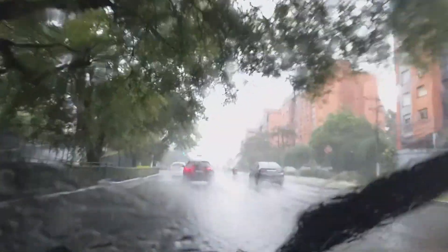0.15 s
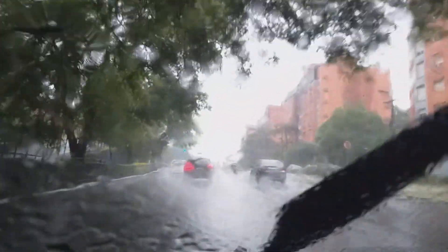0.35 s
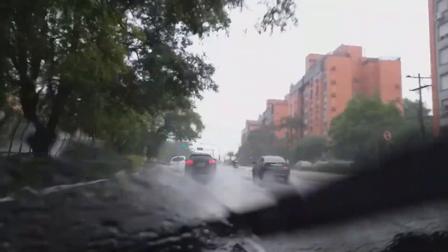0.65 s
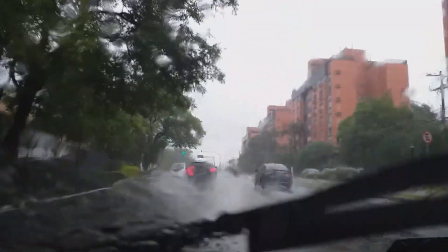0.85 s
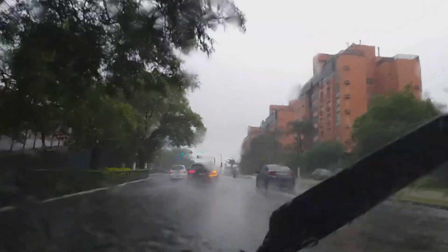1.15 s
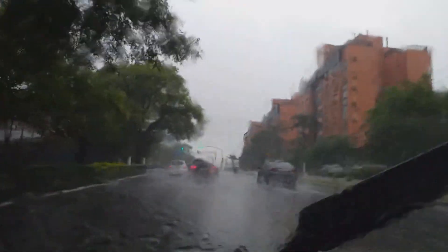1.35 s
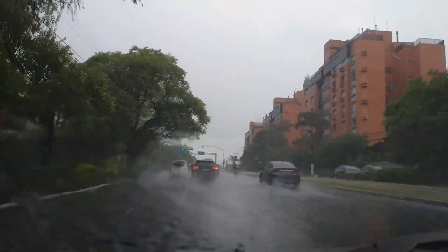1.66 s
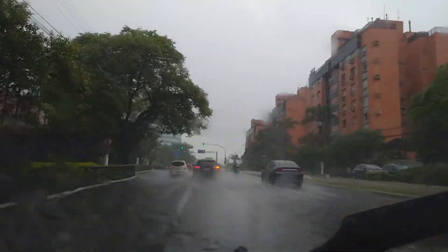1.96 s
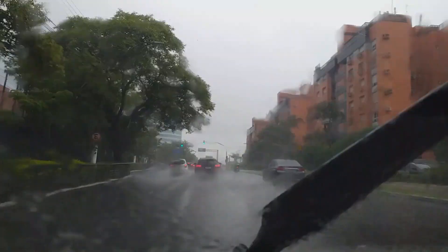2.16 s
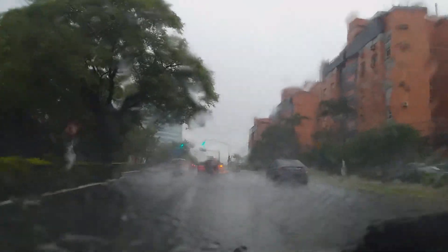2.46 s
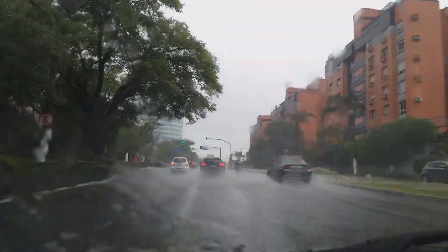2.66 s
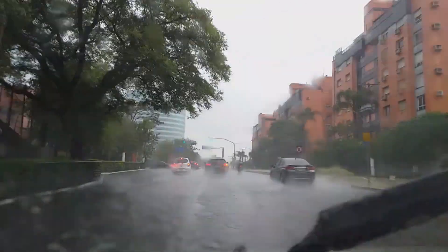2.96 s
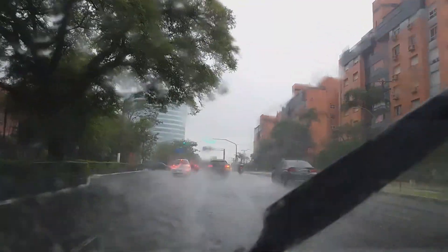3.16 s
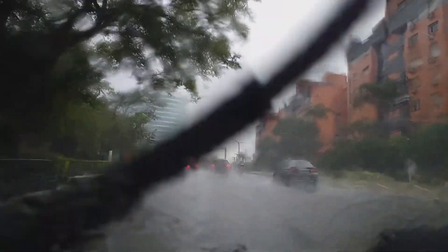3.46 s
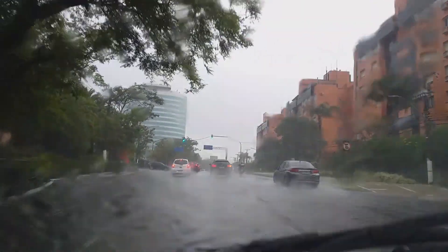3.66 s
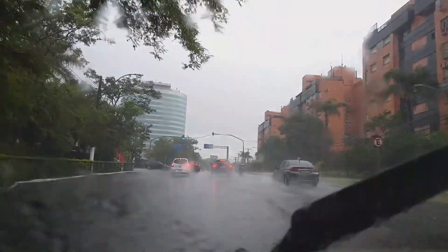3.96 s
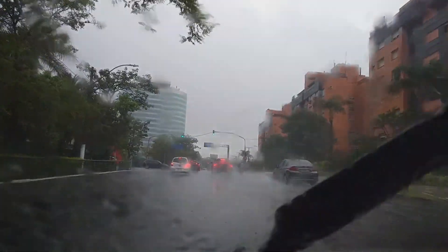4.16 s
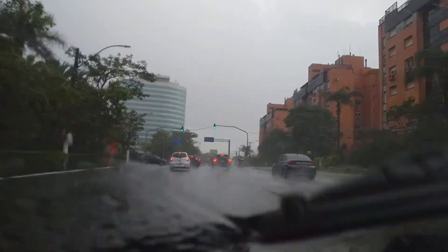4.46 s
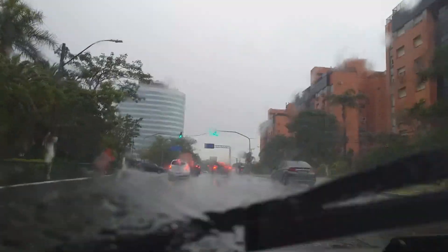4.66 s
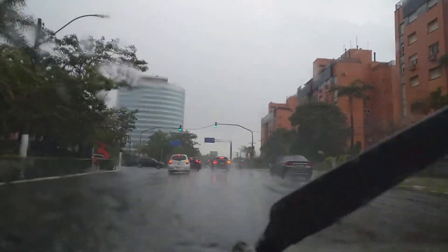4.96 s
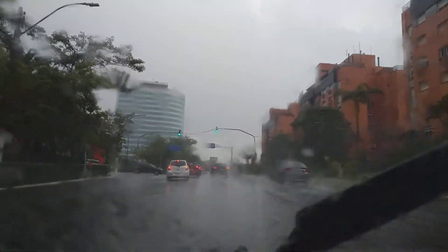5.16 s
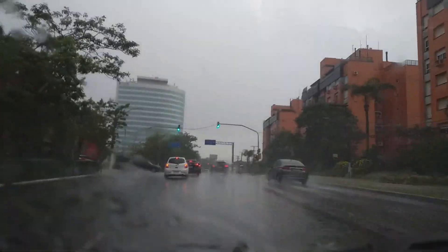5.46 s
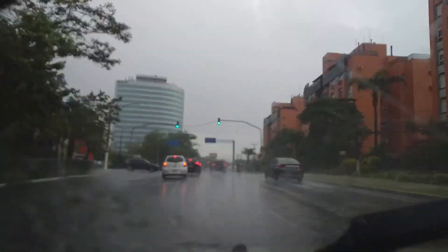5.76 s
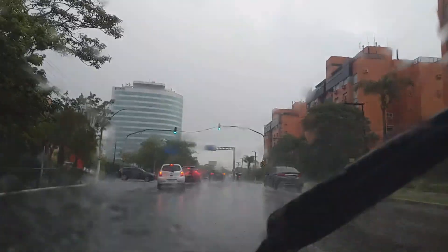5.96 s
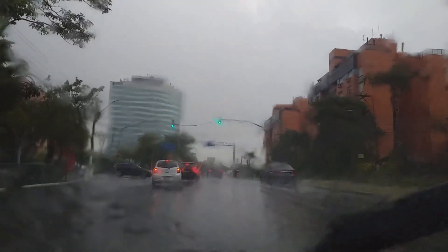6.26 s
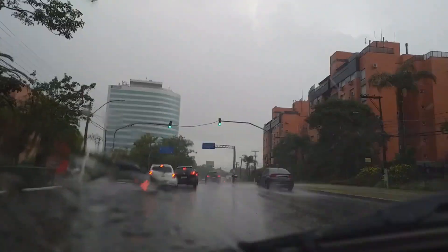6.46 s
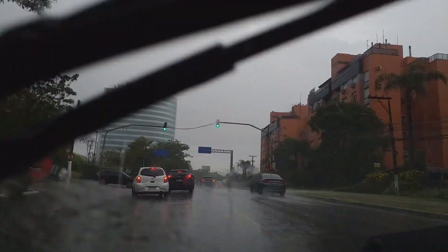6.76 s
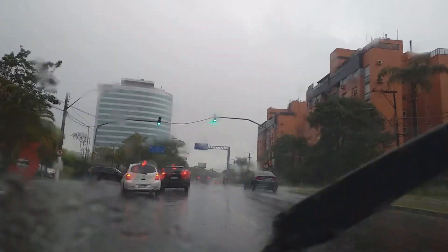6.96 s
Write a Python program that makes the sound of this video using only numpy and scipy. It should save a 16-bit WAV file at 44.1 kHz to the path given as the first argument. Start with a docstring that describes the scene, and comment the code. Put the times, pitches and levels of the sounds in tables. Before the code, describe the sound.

Heavy rain ticks and drums on the windscreen and roof of a slowing car while wipers thump back and forth over a low tyre rumble.

```python
"""Rain on a slowing car

Heavy rain on a car that slows in traffic, heard from the cabin. Drops tick on the windscreen and roof,
with fat ones falling from the trees: each is a short click with echoes and a tail, and the panes ring on.
The wipers knock and slap at each turn, and jolts thump the screen: both are short ringing tones.
Below it all the tyres rumble on the wet road (shaped noise) and the engine note sinks (two sine tones)."""
import sys
import numpy as np
from scipy import signal
from scipy.fft import rfft, irfft
from scipy.io import wavfile
from scipy.ndimage import uniform_filter1d

SR = 44100
rng = np.random.default_rng(int(sys.argv[2]) if len(sys.argv) > 2 else 0)


def master_out(mix):
    """Clip the mix to full scale and print it as 16-bit PCM to the path in sys.argv[1]."""
    frames = np.transpose(np.atleast_2d(mix))
    ceiling = np.clip(frames, -1, 1)
    pcm = np.round(ceiling * 32767).astype(np.int16)
    wavfile.write(sys.argv[1], SR, pcm)


N = 313992
TIME = np.arange(N) / SR  # seconds


def amp(db):
    """Turns decibels into a gain."""
    return 10 ** (np.asarray(db) / 20)


def scale_to_rms_one(x):
    """Scales a sound to an rms of 1."""
    return x / np.sqrt(np.mean(x ** 2) + 1e-20)


def scale_to_energy_one(x):
    """Scales a sound so that its squares add up to 1."""
    return x / (np.linalg.norm(x) + 1e-12)


def scale_to_peak_one(x):
    """Scales a sound to a peak of 1."""
    return x / abs(x).max()


def spectrum_db(points, hz):
    """Reads a spectrum in dB, joining its points by lines on a log-frequency axis."""
    point_hz, point_db = np.transpose(points)
    return np.interp(np.log(hz + 1), np.log(point_hz), point_db)


def curves(rows):
    """Reads each column of a table of times, joined by lines, at every sample."""
    seconds, *columns = np.transpose(rows)
    return [np.interp(TIME, seconds, column) for column in columns]


def add(mix, start_s, sound):
    """Mixes a sound in from a given time, cutting off what runs past the end."""
    part = mix[max(round(start_s * SR), 0):][:len(sound)]
    part += sound[:len(part)]


def shaped_noise(points):
    """Steady noise with a given spectrum, scaled to rms 1."""
    gain = amp(spectrum_db(points, np.fft.rfftfreq(N, 1 / SR)))
    return scale_to_rms_one(irfft(rfft(rng.standard_normal(N)) * gain, N))


def wander(rate_hz):
    """Slow random drift of rms 1: noise that fades out above a given rate."""
    gain = np.exp(-(np.fft.rfftfreq(N, 1 / SR) / rate_hz) ** 2)
    return scale_to_rms_one(irfft(rfft(rng.standard_normal(N)) * gain, N))


def ring(modes, detune, size=8192):
    """A struck body: dying tones, each with the energy its dB gives, randomly detuned at each blow."""
    t = np.arange(size) / SR
    total = np.zeros(size)
    for hz, db, t60 in modes:
        tone = np.sin(2 * np.pi * hz * (1 + detune * rng.standard_normal()) * t)
        total += amp(db) * scale_to_energy_one(tone * amp(-60 * t / t60))
    return total


# The basic colour of a drop heard through the glass.
# Each row: frequency in Hz, level in dB before the changes made for each drop.
GLASS_COLOUR = [(60, -43), (200, -12.5), (450, -10), (760, -6.5), (1100, -13.5), (1650, -6.5), (2600, -4.5),
                (3400, -0.5), (4700, -7.5), (6900, -31), (8700, -41), (10200, -29), (11300, -28.5),
                (13000, -42), (16000, -49)]


def drop(body_db, splash_db, echoed, spot_hz, travel=0., wet_db=-7.5, t60=0.062, spot_db=4.5, size=3072):
    """One impact of energy 1: a click coloured by the glass, waves back from its edges, a short cabin tail."""
    hz, t = np.fft.rfftfreq(size, 1 / SR), np.arange(size) / SR
    body = body_db * spectrum_db([(1400, 1), (2800, 0)], hz)  # full below 1400 Hz
    splash = splash_db * spectrum_db([(4000, 0), (8000, 1)], hz)  # full above 8000 Hz
    spot = spot_db * (np.exp(-((hz - spot_hz) / 500) ** 2) - .3)  # each spot of the pane favours its own pitch
    db = spectrum_db(GLASS_COLOUR, hz) + body + splash + spot

    # give the click a sudden start with nothing before it (minimum phase)
    mirrored_db = np.r_[db, db[-2:0:-1]]
    click = np.exp(np.conj(signal.hilbert(np.log(amp(mirrored_db)))))[:len(hz)]
    # in glass the bass lags the treble; travel is the delay in seconds at 3 kHz
    click = click * np.exp(-4j * np.pi * travel * np.sqrt(3000 * hz))

    delay_s = rng.uniform(0.00037, 0.002412, 7)
    height = scale_to_energy_one(rng.standard_normal(7))
    echoes = height @ np.exp(-2j * np.pi * delay_s[:, None] * hz)
    share = np.clip(echoed, 0, .8)
    late_noise = rng.standard_normal(size) * (t > .0025) * amp(-60 * t / t60)
    tail = rfft(scale_to_energy_one(late_noise))
    response = np.sqrt(1 - share) + np.sqrt(share) * echoes + amp(wet_db) * tail
    return scale_to_energy_one(irfft(click * response))


# Strength of the shower. Each row: time in seconds, level in dB before the gain of each layer of drops.
SHOWER_STRENGTH = [(0, -31.5), (.5, -32), (.72, -36), (1.1, -34), (1.27, -35.5), (1.75, -30), (1.99, -29),
                   (2.13, -34), (2.33, -28.5), (3.1, -28.5), (3.6, -25.5), (4.2, -30), (4.5, -35),
                   (4.85, -38), (5.2, -34.5), (5.58, -35), (5.7, -30), (7.12, -29)]


def patter(per_s, spread_db, gain_db, splash_db, travel, wet_db, brighten=0.076, count=40):
    """Random drops of uneven size, each on one of many spots; per_s is the rate at average shower dB."""
    shower_db, = curves(SHOWER_STRENGTH)
    force_db = shower_db - shower_db.mean()  # a harder shower brings more drops, louder and brighter
    falls = rng.random(N) < per_s * amp(force_db) / SR
    clicks = falls * amp(spread_db * np.minimum(rng.exponential(1, N), 3.2))
    # even out the level between crowded and sparse stretches
    clicks = clicks / np.sqrt(uniform_filter1d(clicks ** 2, size=8000) + 1e-4)

    spot, out = rng.integers(0, count, N), np.zeros(N)
    for k in range(count):
        # some drops sink in the water film, others burst on bare glass
        burst_db = splash_db + 24 * (k / count - .5)
        body_db = 3.4 * rng.standard_normal()
        echoed, spot_hz = rng.uniform(0.087, 0.99), rng.uniform(2150, 4580)
        tick = drop(body_db, burst_db, echoed, spot_hz, travel * rng.random(), wet_db)
        for i in np.flatnonzero(falls & (spot == k)):
            add(out, i / SR, clicks[i] * tick)

    spray = signal.oaconvolve(out, signal.firwin(63, 6000, pass_zero=False, fs=SR), "same")  # above 6 kHz
    brightened = out + (amp(brighten * force_db) - 1) * spray
    return amp(shower_db + gain_db) * scale_to_rms_one(brightened)


# How loud the tyres rumble. Each row: time in seconds, level in dB.
TYRE_LEVEL = [(0, -27), (.4, -28), (1.15, -33.5), (1.5, -30.5), (1.85, -26), (3.5, -24), (4.55, -22.5),
              (4.72, -28.5), (5.35, -29.5), (5.65, -25), (6.65, -23), (7.12, -26.5)]
# The colour of the rumble in the cabin. Each row: frequency in Hz, relative level in dB per Hz.
CABIN_COLOUR = [(20, -42), (35, -23), (60, -9), (88, -1.5), (115, 0.5), (165, -1.5), (235, -11.5),
                (275, -11), (308, -7.5), (350, -13.5), (450, -21.5), (750, -21.5), (1100, -29.5),
                (2500, -64)]


def road(gain_db=0.0, lumpy_db=0.92):
    """Tyre noise booming in the cabin, its level lumpy with the road surface."""
    road_db, = curves(TYRE_LEVEL)
    level_db = road_db + gain_db + lumpy_db * wander(12)
    return amp(level_db) * shaped_noise(CABIN_COLOUR)


# The engine as the car slows. Each row: time in seconds, firing rate in Hz, effort in dB before the boom.
ENGINE_RUN = [(0, 64.1, -27.5), (1.1, 61.6, -35.5), (1.7, 61.5, -37.5), (2.6, 60.25, -27), (4.2, 49.4, -29),
              (4.8, 45.55, -39.5), (6, 40.5, -35.5), (7.12, 37.97, -28)]
# How strongly the cabin booms to an engine tone. Each row: frequency in Hz, gain in dB.
CABIN_BOOM = [(38, -24), (50, -3.5), (60, -1.5), (76, 1), (100, -2), (112, -4.5), (128, -19)]


def engine(waver_db=-1.2):
    """The firing tone and its octave sink through the boom of the cabin as the car slows."""
    firing_hz, effort_db = curves(ENGINE_RUN)
    phase = 2 * np.pi * np.cumsum(firing_hz) / SR
    tones = np.zeros(N)
    for k in (1, 2):
        tones += amp(spectrum_db(CABIN_BOOM, k * firing_hz)) * np.sin(k * phase)
    return np.sqrt(2) * amp(effort_db + waver_db * wander(6.3)) * tones  # root 2 gives a sine rms 1


# Ringing of the panes and roof.
# Each row: frequency in Hz, level in dB before a shared trim, time in seconds to die away by 60 dB.
PANE_RINGING = [(513, -22.5, 0.18), (748, -37, 0.23), (1457, -16, 0.014), (3540, -14.5, 0.004)]


def panes(x, ring_db=-1.5):
    """The windows and roof ring on after every drop, as a few dying tones."""
    colour = amp(spectrum_db(GLASS_COLOUR, np.linspace(0, SR / 2, num=1024)))
    # allow for the colour that the drops already have at each pitch
    modes = [(hz, db - spectrum_db(GLASS_COLOUR, hz), t60) for hz, db, t60 in PANE_RINGING]
    ringing = ring(modes, 0) * np.sqrt(np.mean(colour ** 2))
    return x + amp(ring_db) * signal.oaconvolve(x, ringing)[:N]


# The fattest drops on the glass. Each row: start in seconds, level in dB, low body in dB,
# treble splash in dB, share of energy echoed in the pane from 0 to 1 (held to 0.8 at most).
FATTEST_DROPS = [(.033, -17.5, 1, -2, 0.5), (.0591, -16, 0, -1, .4), (0.1712, -12.5, -2.5, -3, 0.64),
                 (.23, -10, -4, 12, 0.66), (0.296, -19, 1, 8, .55), (.3485, -10, -7, 3.5, .75),
                 (.3767, -12, -3, -8, .7), (0.4901, -10.5, -6.5, 13, 0.73), (.673, -14, -5.5, 5, 0.6),
                 (0.8047, -13.5, 0.5, -9, .8), (0.9634, -16.5, -5, 5, 0.4), (1.0028, -14.5, -1.5, 11, 0.55),
                 (1.0757, -21.5, -2, -18, 0.6), (1.1515, -20, -5.5, 3, .8), (1.3907, -20.5, -1, -1, 0.14),
                 (1.5938, -18, -3.5, 1, .7), (1.6057, -17, -3, 4, 0.03), (1.7893, -14.5, 8, 5, .6),
                 (1.8053, -14.5, 3, 2, 0.7), (1.829, -12.5, 0.5, -6, .8), (1.8827, -18.5, 0.5, 6, .35),
                 (1.985, -14.5, -5, 8.5, 0.03), (2.4984, -14.5, -3.5, 3.5, 0.9), (3.138, -15, -11, -12, 0),
                 (3.5544, -15.5, -6, -20, 0), (3.624, -15, -.5, 9, .7), (4.1336, -12.5, -17, 1, 0.06),
                 (4.1435, -12.5, 0.5, -11, 0.75), (4.1722, -12.5, 1, 8, 0.6), (4.1838, -13.5, -3, 2, 0.4),
                 (4.333, -12.5, -4.5, -6, 0.06), (4.3659, -12, 2.5, -3, .02), (4.4399, -15.5, 4, -7, 0.1),
                 (4.4745, -17, 1, 3, 0.7), (4.572, -18, -6, -6, 0.6), (4.7991, -19.5, 0, -2, 0.9),
                 (5.1628, -20, -14, -1, .2), (5.8825, -16.5, 0, 5, 0), (5.9013, -17, -2, 7, .8),
                 (6.372, -17, 0, 10, .3), (6.42, -16, -1, 1, .8)]
SPOT_HZ, SPOT_SAG_HZ_PER_DB = 2980, 94  # the fuller the body of a drop, the lower the pitch of its spot


def fat_drops(gain_db=0.0):
    """Single loud drops, each one impact whose level is the rms as if spread over 4 ms."""
    out = np.zeros(N)
    for start_s, db, body_db, splash_db, echoed in FATTEST_DROPS:
        spot_hz = SPOT_HZ - SPOT_SAG_HZ_PER_DB * body_db
        tick = drop(body_db, splash_db, echoed, spot_hz, travel=.0002, wet_db=-8.0)
        add(out, start_s, amp(db + gain_db) * np.sqrt(.004 * SR) * tick)
    return out


def drips(above_db=8.0, spread_db=1.1, splash_db=0.0, splash_spread_db=7.0, count=24):
    """Middling drops at random times, each one impact set above the shower's strength."""
    out, (shower_db,) = np.zeros(N), curves(SHOWER_STRENGTH)
    for i in rng.integers(0, N, count):
        size, body, splash = rng.standard_normal(3)
        burst_db = splash_db + splash_spread_db * splash
        echoed, spot_hz = rng.uniform(0.072, 0.89), rng.uniform(2100, 4700)
        tick = drop(2.7 * body, burst_db, echoed, spot_hz, travel=0.00018, wet_db=-9.0)
        level_db = shower_db[i] + above_db + spread_db * size
        add(out, i / SR, amp(level_db) * np.sqrt(.004 * SR) * tick)  # level over 4 ms
    return out


# The windscreen when thumped.
# Each row: frequency in Hz before detuning, relative level in dB, time in seconds to die away by 60 dB.
SCREEN_KNOCK = [(112, -12, 0.13), (184.5, 1, 0.17), (215, 5.5, 0.099), (268.5, -5, 0.23)]


def knock():
    """A thump on the windscreen: its dying tones, with little deep bass."""
    bass_cut = signal.butter(2, 90, "highpass", fs=SR)
    return scale_to_peak_one(signal.lfilter(*bass_cut, ring(SCREEN_KNOCK, 0.06)))


# The blade flipping over.
# Each row: frequency in Hz before detuning, relative level in dB, time in seconds to die away by 60 dB.
BLADE_FLIP = [(544, 1, 0.036), (716, -1, 0.032), (776, -3, 0.03), (950, 4, 0.017), (1130, -8, .02)]
# the wipers swing at a steady pace, then drag: late turns fall further and further behind
SWEEP_S, FIRST_TURN_S, RETURN_S = 0.951, 0.408, 0.397
DRAG_FROM_S, DRAG_SHARE = 5.78, 0.144
# the two ends of a sweep, before the trims in wipers():
# turn above the tyre level in dB, rubber blade relative to that in dB
FAR_END, PARK_END = (15.8, -8.0), (13.8, -23)


def wipers(knock_db=-2.5, flip_db=0.5, slap_db=0.0):
    """At each turn the arms thump the screen and the blades flip with a wet slap; all swell with the rumble."""
    out, (road_db,) = np.zeros(N), curves(TYRE_LEVEL)
    for sweep_s in np.arange(FIRST_TURN_S, N / SR, SWEEP_S):
        for turn_s, (turn_db, blade_db) in (sweep_s, FAR_END), (sweep_s + RETURN_S, PARK_END):
            turn_s = turn_s + DRAG_SHARE * max(turn_s - DRAG_FROM_S, 0)
            base_db = np.interp(turn_s, TIME, road_db) + turn_db
            flip = scale_to_peak_one(ring(BLADE_FLIP, 0.092))
            slap = scale_to_peak_one(drop(body_db=16.0, splash_db=-19, echoed=0.31, spot_hz=2200,
                                          travel=0.001, wet_db=-3.5, t60=0.28))
            add(out, turn_s, amp(base_db + knock_db) * knock())
            add(out, turn_s, amp(base_db + blade_db + flip_db) * flip)
            add(out, turn_s, amp(base_db + blade_db + slap_db) * slap)
    return out


# Jolts that thump the screen. Each row: start in seconds, peak level in dB.
ROAD_JOLTS = [(3.598, -11), (4.565, -15), (6.116, -14)]


def jolts():
    """Bumps in the road thump the screen, with the same ringing tones as a wiper knock."""
    out = np.zeros(N)
    for start_s, peak_db in ROAD_JOLTS:
        add(out, start_s, amp(peak_db) * knock())
    return out


def scene():
    """Near drops on the screen, a dense wash from the whole body of the car, and the car itself."""
    near = patter(per_s=115, spread_db=3.8, gain_db=-2.2, splash_db=-2, travel=.0008, wet_db=-8)
    far = patter(per_s=750, spread_db=4.0, gain_db=-3.5, splash_db=-4.0, travel=.003, wet_db=-1)
    rain = panes(near + far + fat_drops() + drips())
    car = road() + engine() + wipers() + jolts()
    return (rain + car)[None]


EDGE_HZ = 16200  # top of the microphone's band


def record(dry, ceiling=1.0, low_cut_hz=33):
    """The microphone drops the deepest bass and clips peaks above its ceiling; then the treble is cut off."""
    low_cut = signal.butter(3, low_cut_hz, "highpass", fs=SR, output="sos")
    thinned = signal.sosfilt(low_cut, dry)
    clipped = np.clip(thinned, -ceiling, ceiling)
    band_limit = signal.firwin(255, EDGE_HZ, window=("kaiser", 9), fs=SR)
    return signal.oaconvolve(clipped, band_limit[None], "same")


dry = scene()
out = record(dry)
master_out(out)
```